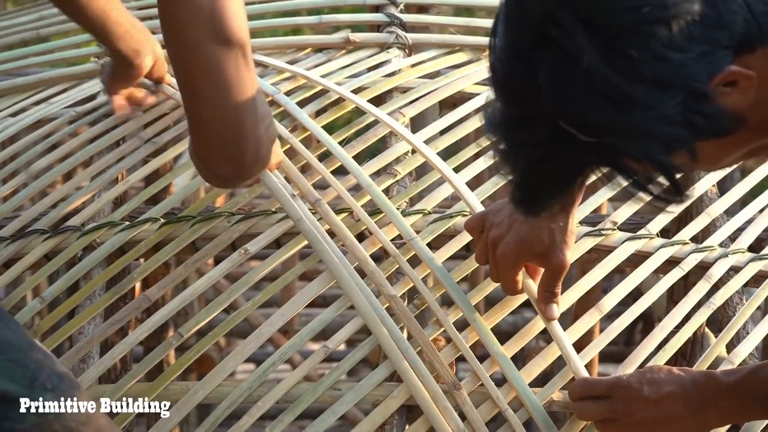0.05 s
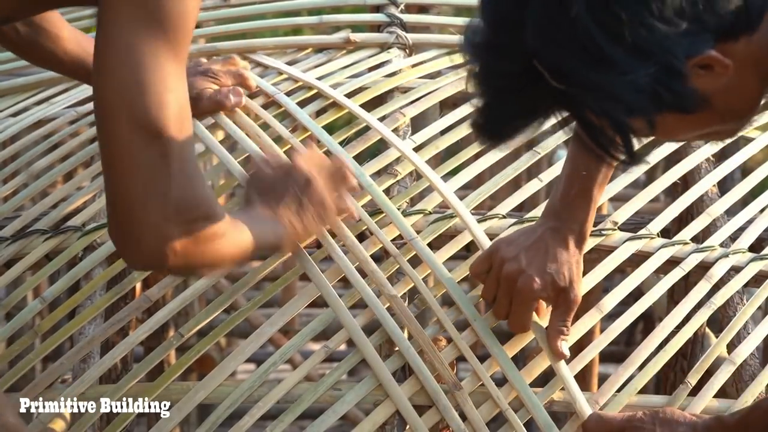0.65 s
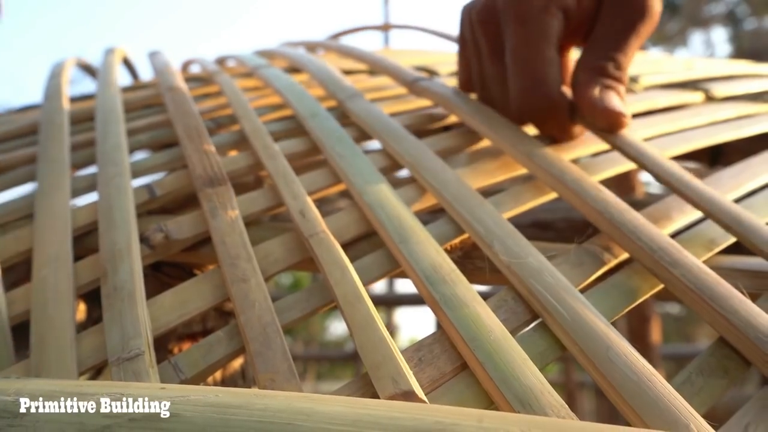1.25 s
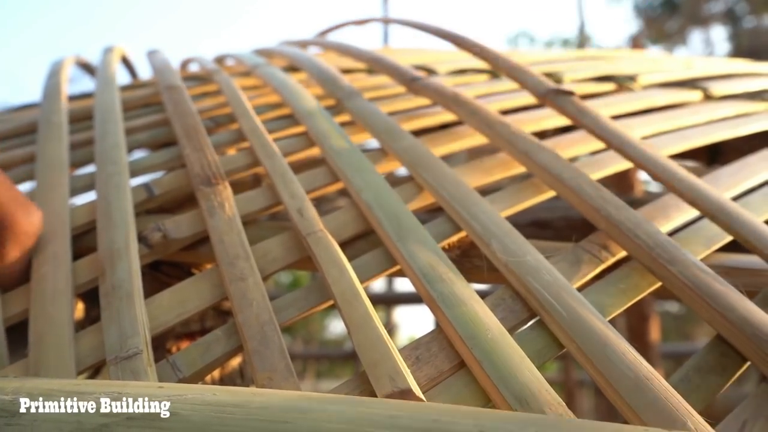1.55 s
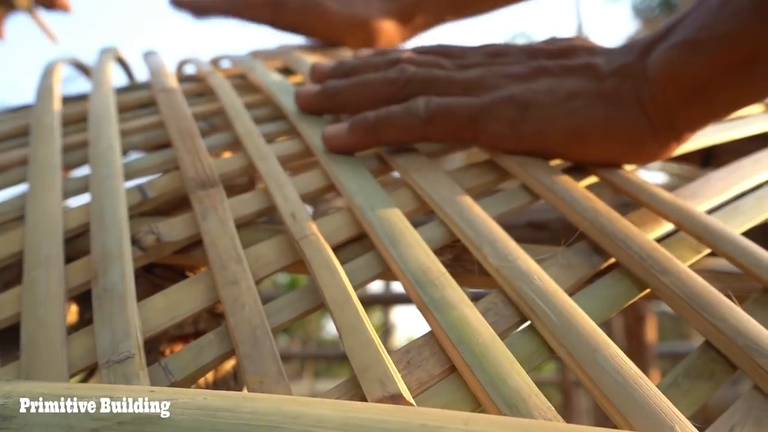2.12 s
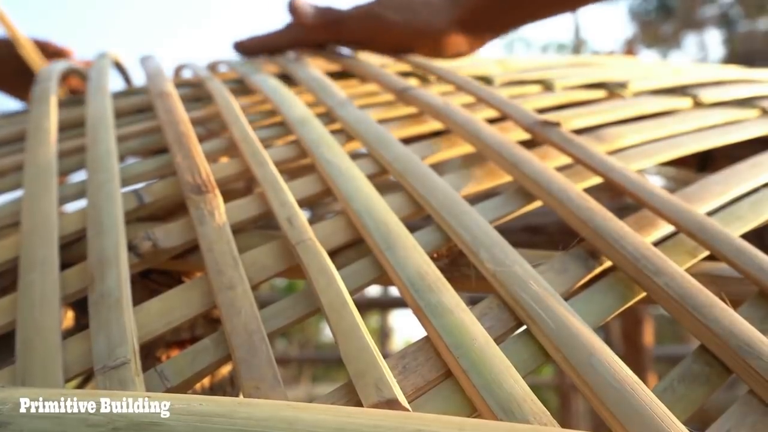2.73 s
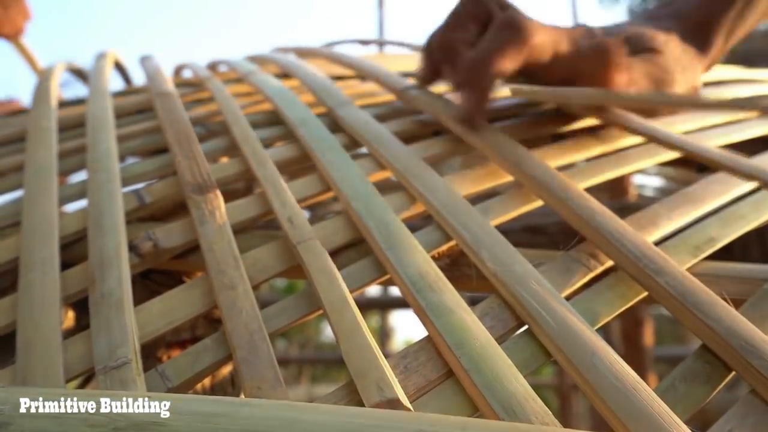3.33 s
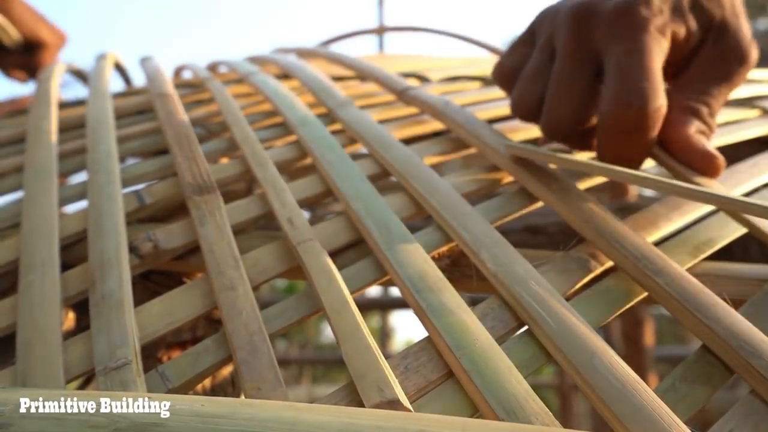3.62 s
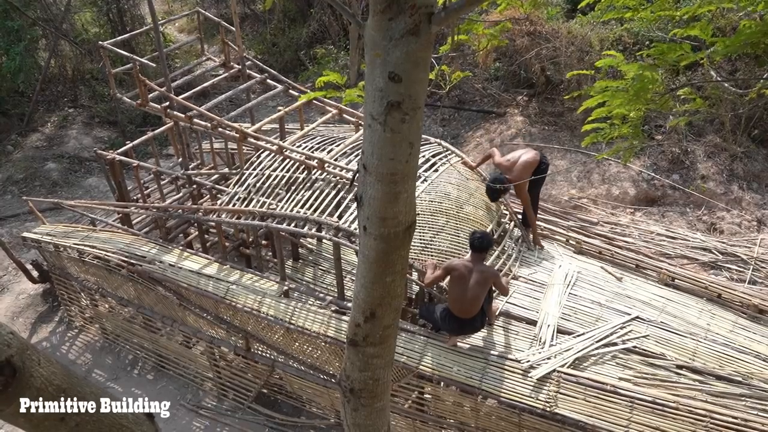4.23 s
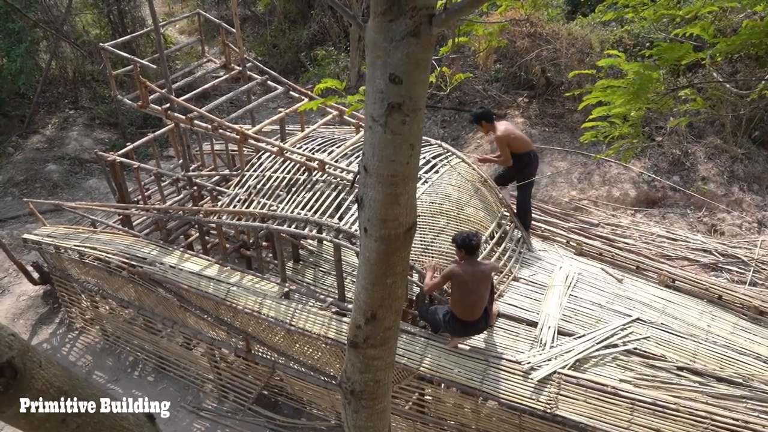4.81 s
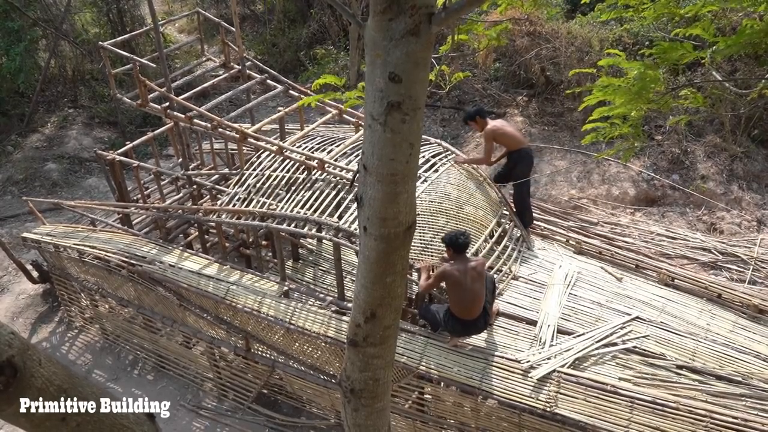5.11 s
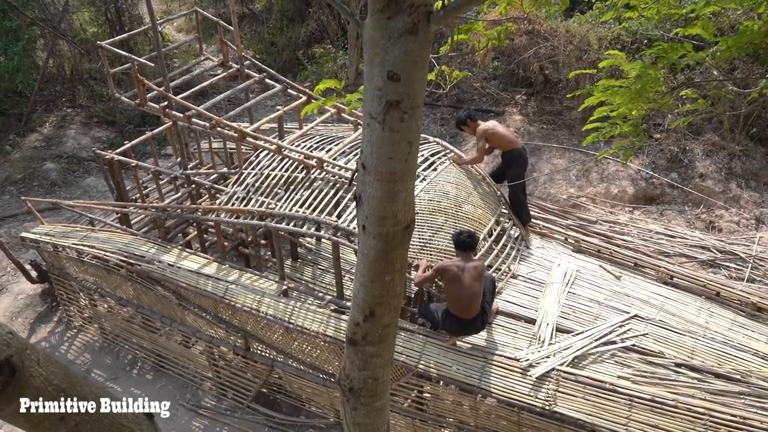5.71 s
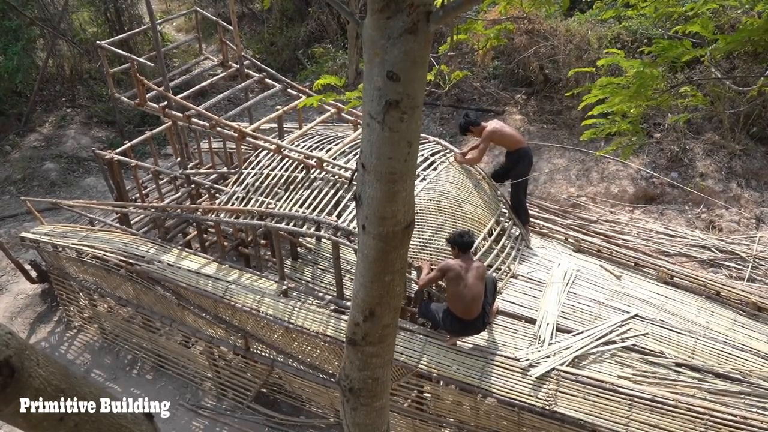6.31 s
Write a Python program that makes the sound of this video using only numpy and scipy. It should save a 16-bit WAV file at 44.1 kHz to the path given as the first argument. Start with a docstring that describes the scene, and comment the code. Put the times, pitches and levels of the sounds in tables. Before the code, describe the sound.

Close by, thin bamboo strips snap and click irregularly against a lattice, with short dry scrapes as they slide through and soft low thuds from the frame. A far bird gives a few faint falling chirps. About halfway, the work suddenly sounds further off, leaving sparse, quiet ticks and a faint hiss of cicadas. A low outdoor rumble and light rustle lie underneath.

```python
"""Weaving bamboo outdoors

Thin strips are woven by hand into a domed bamboo frame, first close by, then from further off.
They snap against the lattice, slide over each other in stick-slip grains and make the frame thud.
Behind them: a far bird's falling chirps, the hiss of cicadas, a soft rustle and a low rumble."""
import sys
import numpy as np
from scipy import signal
from scipy.fft import rfft, irfft, next_fast_len
from scipy.io import wavfile
from scipy.ndimage import uniform_filter1d

SR = 44100
rng = np.random.default_rng(int(sys.argv[2]) if len(sys.argv) > 2 else 0)


def store_pcm(level_fs):
    """Save levels as 16-bit WAV."""
    pcm = np.round(np.clip(level_fs, -1, 1) * 32767).astype(np.int16)
    wavfile.write(sys.argv[1], SR, np.atleast_2d(pcm).T)


N = 288855
TIME = np.arange(N) / SR
MOVE_S = 3.475  # close before, further off after

# strip snapping on the lattice: peak_s, level_db, slip_ms, decay_ms, treble_db
SNAPS = [(.082, -13.5, 2.93, 3.25, -1), (.311, -35, .5, 1.44, -2), (0.3809, -21.5, .6, 3.65, -3),
         (.6508, -32.5, 0.47, 4.3, -1.5), (0.7087, -16, 1.84, 3.63, 6.5), (0.7147, -18, 1.09, 3.9, -12),
         (.835, -32, .5, 5.1, 6), (1.047, -36, 2.16, 6.6, -3), (1.091, -19, .7, 3.5, -17),
         (1.282, -34, 3.86, 7.3, -12), (1.569, -20, 2, 4.6, -1), (1.581, -18.5, 2.26, 5.4, 4),
         (1.739, -26, 2.1, 6, -12), (1.8879, -30, 0.72, 10.7, -6), (1.903, -32.5, 0.98, 7, -11),
         (2.269, -36.5, .6, 3.8, 4), (2.349, -25, 2.4, 2.8, 4), (2.3715, -26, 0.64, 5, -2),
         (2.418, -28, 0.57, 3.1, 3), (2.4384, -20, 0.97, 1.95, 8.5), (2.486, -24, 5.47, 6.3, -1.5),
         (2.581, -25.5, 3.1, 5.6, 15.5), (3.0654, -13.2, .45, 2.82, -5), (3.115, -30, 0.94, 5.5, 2),
         (3.1344, -18.5, .6, 3.2, -12.5), (3.1731, -26, 0.46, 4.1, -3.5), (3.96, -59.5, 2, 10, -9),
         (4.257, -35, 0.097, .9, 22), (4.767, -51, 0.52, 3.5, 2), (5.005, -51, 2.02, 11, -7),
         (5.195, -53.5, 1.1, 5.7, -1), (5.2494, -46.5, 0.58, 4.4, 8), (5.321, -31.5, 1.5, 4.6, 14.5),
         (5.464, -46.5, 1, 25, -3), (5.86, -43, .5, 10, 6), (6.159, -36.5, .3, 5.8, 9.5),
         (6.3241, -40, 0.89, 7.9, -2)]


def snaps(slip_db=-3, chatter_db=2, scuff_db=-12.5, scuff_ms=5.5, rattle_ms=21):
    """A strip slips and cracks down, chattering; its neighbours scuff and rattle, duller and longer."""
    out = np.zeros((2, N))
    for peak_s, level_db, slip_ms, decay_ms, treble_db in SNAPS:
        far = peak_s > MOVE_S
        pan_db = -4 - .1 * treble_db  # sharpest ticks furthest right
        body_db = min(7 * softness_octaves(decay_ms), 2.5) - 1.5 * far
        # snap spectrum: freq_hz, density_db
        colour = [(60, -22), (250, -2), (520, -3.5), (720, -6.5), (1300, -1), (2300, 3), (3900, -2),
                  (5500, -2), (7500, -1), (9500, -7), (12000, -13.5), (16000, -20)]

        t, blow = swell(slip_ms, decay_ms)
        blow *= undb(slip_db * (t < 0))
        force = rng.standard_normal((2, len(t))) * blow * undb(chatter_db * walk(900, len(t)))
        crack = unit(strip(force, colour, body_db, treble_db, pan_db))
        add(out, crack * rms(blow) * undb(level_db), peak_s + t[0])

        t, shake = swell(scuff_ms, rattle_ms)
        rattle_db = -11 if far else -18.5
        shake *= undb(level_db + np.where(t < 0, scuff_db, rattle_db))
        shake *= min(decay_ms / 4, 1)  # a tiny tick hardly shakes the lattice
        force = rng.standard_normal((2, len(t))) * shake
        rattle = strip(force, colour, body_db + 4, treble_db - 3, pan_db / 2)
        add(out, rattle, peak_s + t[0])
    return out


def softness_octaves(decay_ms, plain_ms=6.4):
    """Contact time against a plain contact; softer lasts longer."""
    return np.log2(max(decay_ms, .3) / plain_ms)


def slides(judder_db=1.7, judder_hz=219, handover_hz=35, threading_s=(.45, 1.5), plain_pull_db=-37):
    """A drawn strip judders, bearing in turn on two neighbours that ring differently."""
    # pulls on a strip: start_s, length_s, level_db, body_db, treble_db
    pulls = [(0.091, 0.022, -36, -1.5, -2), (0.206, 0.02, -47.5, 6, -6), (0.474, 0.043, -37, -0.5, -2),
             (0.552, 0.17, -48.5, -5, -4), (.725, 0.038, -35, 4.5, -1.5), (0.831, 0.04, -40, -5.5, 0),
             (0.919, 0.059, -41, -6, 3), (1.049, .03, -44, -2, 7), (1.109, 0.067, -33.5, 3, -5),
             (1.211, 0.086, -42, 0, 1.5), (1.349, 0.11, -43, -0.5, 0), (1.629, 0.053, -50, 1, -6),
             (1.738, 0.019, -34.5, 0, -8.5), (2.06, 0.16, -54, 1, -11), (2.33, 0.038, -37.5, 0, -5),
             (2.4, 0.19, -47.5, 5.5, -5), (2.852, 0.14, -50, 1, 5.5), (3.12, .012, -36.5, 5, -4),
             (3.194, .025, -34, -7, -12), (3.268, 0.0084, -41.5, -2.5, 4.5), (3.401, 0.011, -39, -1, -9.5)]
    # slide spectrum: freq_hz, density_db
    colour = [(60, -20.5), (250, 3), (600, -8), (1300, -3.5), (2500, -0.5), (3900, -3), (5500, -2.5),
              (7500, -1), (10000, -4), (12500, -10), (16000, -15)]
    out = np.zeros((2, N))
    for start_s, length_s, level_db, body_db, treble_db in pulls:
        t, speed = pull(length_s)
        # a long strip's edge rasps while threaded through, most under a light pull
        threading = threading_s[0] < start_s < threading_s[1]
        rasp_db = (4 - .35 * (level_db - plain_pull_db)) * threading
        judder = unit(undb(judder_db * walk(judder_hz, len(t))))
        lean = np.tanh(2 * walk(handover_hz, len(t)))
        for share in ((1 + lean) / 2, (1 - lean) / 2):
            force = fibres(len(t)) * judder * speed * np.sqrt(share)
            scrape = strip(force, colour, body_db, treble_db, pan_db=-2.5, rasp_db=rasp_db, echo=.32)
            add(out, scrape * undb(level_db), start_s + t[0])
    return out


def pull(length_s, rise_s=.015, release_s=.027, sag_db_per_s=12):
    """Time in s and relative speed of a strip that is tugged, slows a little and is let go."""
    t = np.arange(-int(.05 * SR), int((length_s + .2) * SR)) / SR
    edges = np.minimum(t, 0) / rise_s - np.maximum(t - length_s, 0) / release_s
    return t, np.exp(edges) * undb(-sag_db_per_s * np.clip(t, 0, length_s))


def fibres(size, grains_per_s=6000, spread_db=3, ticks_per_s=110, tick_db=14):
    """Dense tiny fibre catches, with a sharper tick where a splinter lets go."""
    shape = (2, size)
    strengths = undb(spread_db * np.minimum(rng.exponential(size=shape), 4))
    grains = (rng.random(shape) < grains_per_s / SR) * rng.choice([-1, 1], shape) * strengths
    splinters = rng.random(size) < ticks_per_s / SR
    ticks = splinters * rng.choice([-1, 1], shape) * rng.uniform(.8, 1.5, size)
    return unit(unit(grains) + undb(tick_db) * ticks)


def strip(force, colour, body_db, treble_db, pan_db, rasp_db=0, detune=.039, echo=.19, echo_s=.007):
    """One strip rings; its modes shift with free length, and waves return from the crossings."""
    # strip modes: pitch_hz, width_hz, boost_db
    modes = [(817, 164, 7), (1291, 210, 5.5), (1587, 130, 3.5), (2095, 160, 3), (2665, 77, 3.5),
             (2890, 64, 2.5), (3357, 170, 4), (4200, 130, 4.5), (5235, 280, 6.5), (6030, 360, 1.5),
             (6170, 230, 3.5), (8500, 280, 0.5)]
    shifts = 1 + detune * rng.standard_normal(len(modes))
    drives = rng.uniform(.4, 2.09, size=len(modes))  # the contact point favours some modes
    lags_s = echo_s * rng.uniform(.1453, 1, size=4)

    def response_db(hz):
        modes_db = sum(db * drive * bell(hz, pitch_hz * shift, width_hz)
                       for (pitch_hz, width_hz, db), shift, drive in zip(modes, shifts, drives))
        edge_db = rasp_db * bell(hz, centre_hz=5330, width_hz=480)
        contact_db = body_db / (1 + (hz / 1700) ** 4) + treble_db / (1 + (8000 / hz) ** 4)
        crossings = 1 + echo * np.exp(-2j * np.pi * np.outer(lags_s, hz)).sum(axis=0)
        comb_db = 20 * np.log10(abs(crossings) + 1e-3)
        return colour_db(colour, hz) + modes_db + edge_db + contact_db + comb_db
    return radiate(force, response_db, pan_db)


def thuds(rise_ms=12, press_fall_ms=32, snap_fall_ms=20, lag_s=.014):
    """The lashed frame's many low modes boom under a load and after each snap."""
    # hand or foot leaning on the frame: peak_s, level_db
    presses = [(.725, -36), (0.795, -38.5), (1.12, -52), (1.762, -39), (1.91, -35.5), (3.13, -50),
               (3.41, -55), (4.529, -55), (4.655, -47), (5.34, -55), (5.558, -54)]
    # frame spectrum: freq_hz, density_db
    colour = [(20, -13.5), (45, -8), (75, 1), (115, -3), (190, -7), (300, -18.5), (550, -28.5), (1500, -50),
              (5000, -78.5)]
    loads = [(peak_s, level_db, press_fall_ms) for peak_s, level_db in presses]
    for snap_s, snap_db, _, decay_ms, _ in SNAPS:
        thud_db = snap_db - 26.5 + 7.5 * softness_octaves(decay_ms)  # soft contacts shake it more
        loads.append((snap_s + lag_s, thud_db, snap_fall_ms))
    out = np.zeros((2, N))
    for peak_s, level_db, fall_ms in loads:
        t, load = swell(rise_ms, fall_ms)
        boom = radiate(rng.standard_normal((2, len(t))) * load, lambda hz: colour_db(colour, hz))
        add(out, unit(boom) * rms(load) * undb(level_db), peak_s + t[0])
    return out


def rubs(width_hz=450, rise_ms=16, fall_ms=18):
    """A light rub wakes only one low resonance."""
    # soft hollow rubs: peak_s, pitch_hz, level_db
    touches = [(.55, 1348, -43), (1.16, 1290, -35.5), (1.38, 1244, -42.5), (1.645, 1246, -48),
               (2.15, 1195, -45.5), (2.18, 1600, -46), (2.66, 1142, -46), (2.915, 1242, -47),
               (3.17, 1200, -37.5), (3.425, 1107, -41.5)]
    out = np.zeros((2, N))
    for peak_s, pitch_hz, level_db in touches:
        t, strength = swell(rise_ms, fall_ms)
        ring = noise_band(np.full(len(t), pitch_hz), width_hz)
        add(out, ring * strength * undb(level_db), peak_s + t[0])
    return out


def bird(high_hz=5200, low_hz=3300, length_s=.105, blur_hz=1150, flutter_db=1.9):
    """Hoarse falling chirps, blurred and broken up by trees."""
    # far chirps: start_s, level_db
    chirps = [(1.624, -51), (2.18, -48.5), (2.644, -50), (3.465, -66.5), (4.3, -74), (4.65, -64),
              (5.983, -60.5)]
    progress = np.linspace(0, 1, int(length_s * SR))
    pitch_hz = high_hz * (low_hz / high_hz) ** progress
    envelope = np.sqrt(abs(np.sin(np.pi * progress)))
    out = np.zeros((2, N))
    for start_s, level_db in chirps:
        chirp = noise_band(pitch_hz, blur_hz)
        flutter = unit(undb(flutter_db * walk(85, len(progress))))
        add(out, chirp * flutter * envelope * undb(level_db), start_s)
    return out


def cicadas(hiss_width_hz=1100, flutter_db=1):
    """A gliding hiss, joined by a chorus of shrill lines at steady pitches."""
    # course of the chorus: time_s, hiss_hz, hiss_db, shrill_db
    chorus = [(3.4, 6840, -71, -84.5), (3.8, 6480, -78, -83.5), (4.4, 6200, -72, -95.5),
              (4.85, 6040, -71, -80), (5.1, 6800, -74, -68), (5.4, 7950, -67, -67.5),
              (5.9, 8160, -65, -66.5), (6.55, 8190, -64, -65)]
    # shrill lines: pitch_hz, width_hz, gain_db
    lines = [(4740, 140, -6), (5500, 200, -11), (5900, 150, -6.5), (6640, 220, -18), (7100, 170, -2.5),
             (7700, 150, -10.5), (8060, 150, -11.5)]
    hiss_hz, hiss_db, shrill_db = curves(chorus)
    shrill = sum(undb(db) * noise_band(np.full(N, hz), width_hz) for hz, width_hz, db in lines)
    hiss = noise_band(hiss_hz, hiss_width_hz)
    return (undb(hiss_db) * hiss + undb(shrill_db) * shrill) * undb(flutter_db * walk(40, N))


def rumble():
    """Low rumble of the outdoor air."""
    # rumble spectrum: freq_hz, density_db
    colour = [(15, -19), (25, -10), (40, -5.5), (50, -1), (56, 0.5), (66, -3.5), (80, -9.5), (115, -13.5),
              (200, -29.5), (500, -55)]
    # course of the rumble: time_s, level_db
    levels = [(0, -47), (.36, -49), (.48, -56), (.75, -49.5), (1.6, -58), (3.1, -53), (3.44, -56),
              (3.54, -68.5), (4.2, -62.5), (4.4, -67.5), (4.8, -58), (5.15, -63), (5.5, -52.5), (5.8, -67),
              (6.55, -52.5)]
    return noise_bed(colour) * undb(curves(levels)[0])


def rustle(far_db=-71.5, growth_db_per_s=3.5, crossfade_s=.009, flicker_db=1):
    """The handled weave rustles; further off it is faint and grows slowly."""
    # close spectrum: freq_hz, density_db
    near_colour = [(40, -6.5), (150, 5.5), (300, 2), (700, -0.5), (1300, -3.5), (2000, -3), (4000, -3.5),
                   (6000, -6), (10000, -11), (16000, -18)]
    # distant spectrum: freq_hz, density_db
    far_colour = [(40, 4), (160, 6.5), (400, 1), (900, 0), (2200, -3.5), (3000, -3.5), (4000, -3.5),
                  (6500, 0.5), (10000, -13), (16000, -18)]
    # close handling: time_s, level_db
    near_levels = [(0, -55), (.35, -53.5), (.8, -52), (1.5, -54), (1.85, -55.5), (2.55, -49), (2.78, -54),
                   (3.45, -51.5)]
    near = noise_bed(near_colour) * undb(curves(near_levels)[0])
    far = noise_bed(far_colour) * undb(far_db + growth_db_per_s * (TIME - MOVE_S))
    away = np.clip((TIME - MOVE_S) / crossfade_s, 0, 1)
    return ((1 - away) * near + away * far) * undb(flicker_db * walk(22, N))


def radiate(force, response_db, pan_db=0, wide_hz=2100):
    """Mid and side forces ring a unit-power filter; bass stays central. Positive pan is left."""
    size = 2 * next_fast_len(force.shape[1] // 2 + 2048)
    hz = np.maximum(np.fft.rfftfreq(size, 1 / SR), 1)
    cepstrum = irfft(np.log(unit(undb(response_db(hz)))))
    cepstrum[1:size // 2] *= 2  # fold to minimum phase
    cepstrum[size // 2 + 1:] = 0
    mid, side = rfft(force, size) * np.exp(rfft(cepstrum))
    width = np.clip((hz / wide_hz) ** .7, .19, 1)
    ears = undb(np.outer([.5, -.5], pan_db * width))
    ears /= np.sqrt(np.mean(ears ** 2, axis=0) * (1 + width ** 2))
    return irfft(ears * [mid + width * side, mid - width * side])[:, :force.shape[1]]


def noise_bed(colour):
    """Steady coloured noise, slightly right."""
    return radiate(rng.standard_normal((2, N)), lambda hz: colour_db(colour, hz), pan_db=-2)


def noise_band(pitch_hz, width_hz):
    """A pitch blurred into a narrow band, different in each ear."""
    lowpass = signal.butter(2, width_hz / 2, fs=SR, output="sos")
    blur = signal.sosfilt(lowpass, rng.standard_normal((2, len(pitch_hz), 2)) @ [1, 1j])
    carrier = np.exp(2j * np.pi * np.cumsum(pitch_hz) / SR)
    return unit(np.real(blur * carrier))


def swell(rise_ms, fall_ms):
    """Time from the peak in s, and an exponential rise and fall."""
    rise_s, fall_s = max(rise_ms, .05) / 1000, max(fall_ms, .3) / 1000
    t = np.arange(-int(5 * rise_s * SR), int((6 * fall_s + .1) * SR)) / SR
    return t, np.exp(-np.maximum(-t / rise_s, t / fall_s))


def walk(rate_hz, size):
    """Random values joined by ramps."""
    hold = max(int(SR / rate_hz), 1)
    steps = np.repeat(rng.standard_normal(size // hold + 1), hold)
    return 1.48 * uniform_filter1d(steps, hold)[:size]


def bell(hz, centre_hz, width_hz):
    """Resonance peak of height 1."""
    return 1 / (1 + (2 * (hz - centre_hz) / width_hz) ** 2)


def colour_db(points, hz):
    """Spectrum interpolated over log frequency."""
    points_hz, db = np.transpose(points)
    return np.interp(np.log(hz), np.log(points_hz), db)


def curves(table):
    """Table columns interpolated over time."""
    time_s, *columns = np.transpose(table)
    return [np.interp(TIME, time_s, column) for column in columns]


def add(out, sound, start_s):
    """Mix a sound in at its time."""
    first = int(round(start_s * SR))
    a, b = max(first, 0), min(first + sound.shape[1], N)
    out[:, a:b] += sound[:, a - first:b - first]


def undb(db):
    """Decibels to gain."""
    return 10 ** (np.asarray(db) / 20)


def rms(x):
    """Root mean square."""
    return np.sqrt(np.mean(x ** 2))


def unit(x):
    """Scale to rms 1."""
    return x / rms(x)


def scene():
    """The weaving and the outdoors around it."""
    return snaps() + slides() + thuds() + rubs() + bird() + cicadas() + rumble() + rustle()


def record(dry):
    """Steep low-pass at 16.1 kHz."""
    return signal.sosfilt(signal.ellip(10, .2, 70, 16100, fs=SR, output="sos"), dry)


dry = scene()
out = record(dry)
store_pcm(out)
```